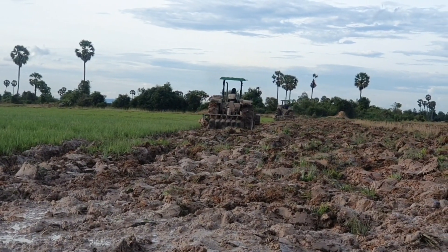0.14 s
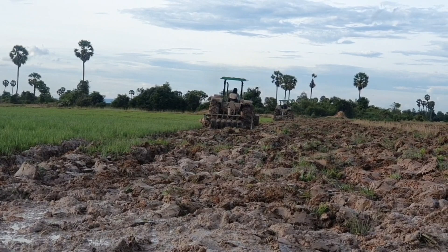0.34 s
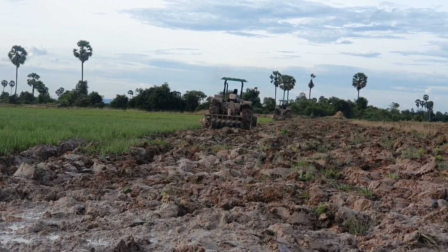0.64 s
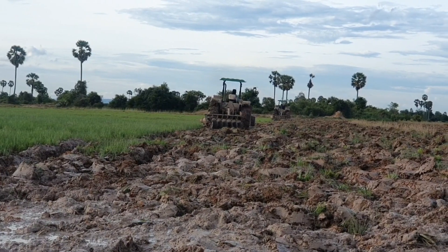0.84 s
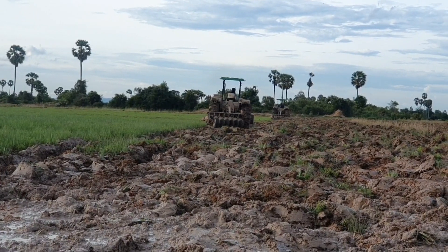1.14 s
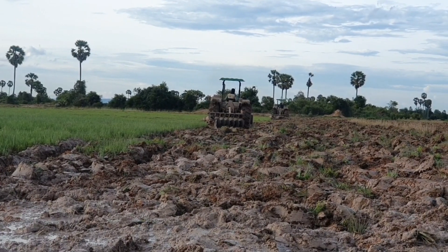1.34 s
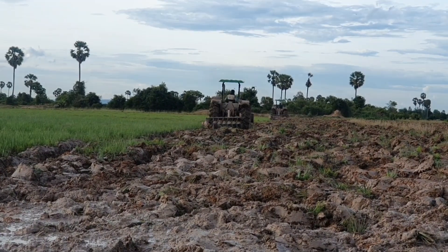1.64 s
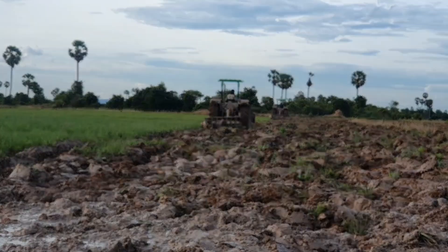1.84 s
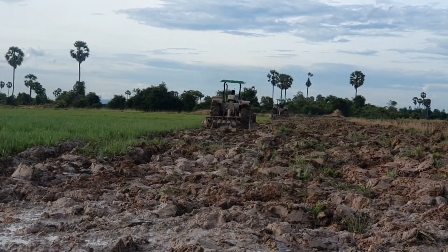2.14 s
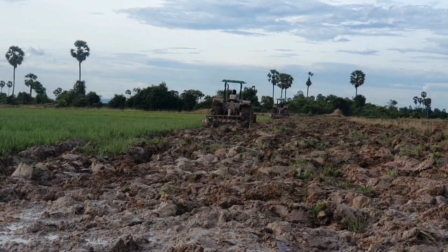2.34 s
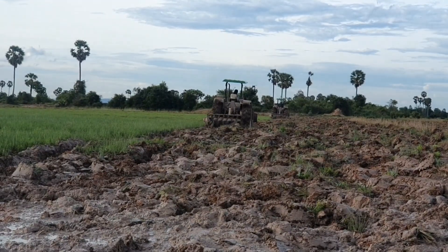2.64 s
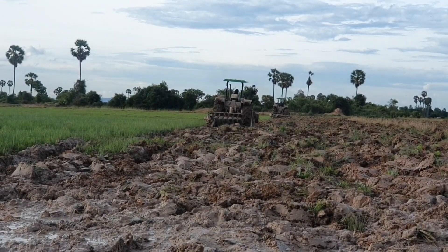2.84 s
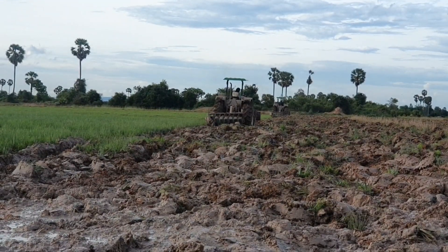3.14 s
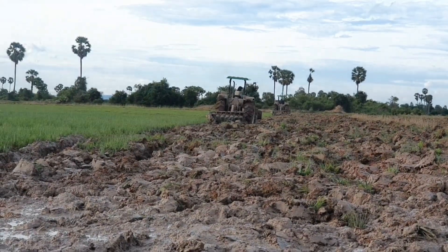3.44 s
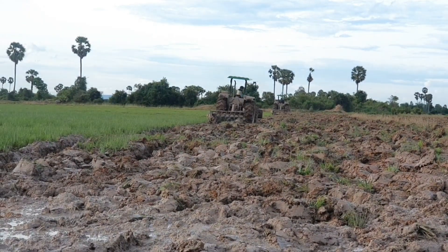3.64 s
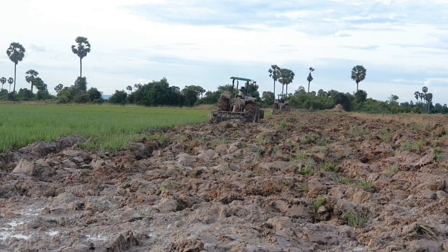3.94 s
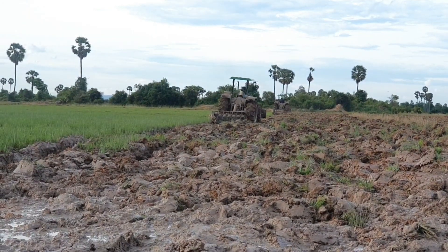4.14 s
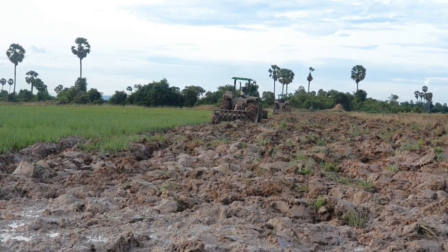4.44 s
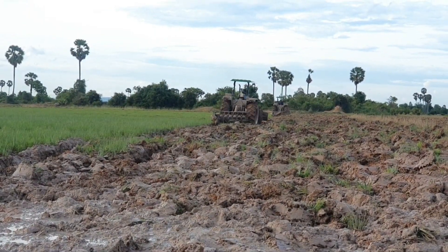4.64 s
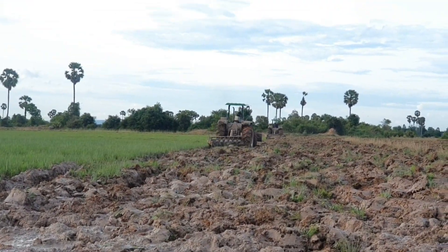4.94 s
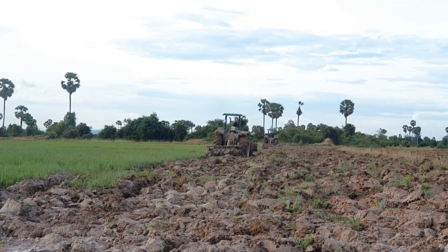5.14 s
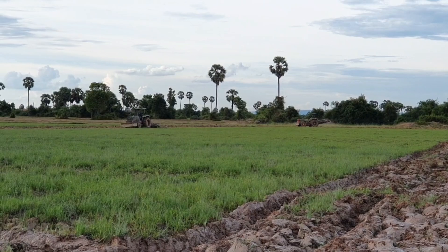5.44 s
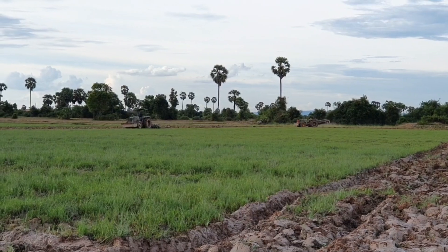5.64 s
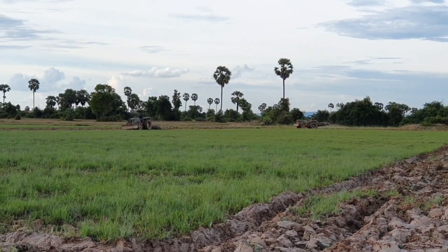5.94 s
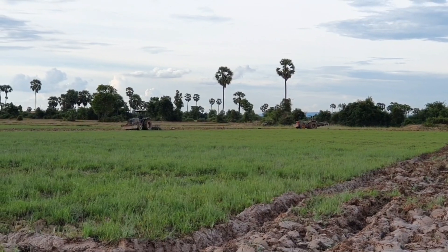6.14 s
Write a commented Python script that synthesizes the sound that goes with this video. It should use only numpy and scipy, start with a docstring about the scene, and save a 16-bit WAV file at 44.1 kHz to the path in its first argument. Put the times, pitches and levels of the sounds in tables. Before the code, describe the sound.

A diesel tractor drones and rattles some way off as wind buffets the microphone, then a click cuts to a fainter engine whirr.

```python
"""A diesel tractor pulls a plough across an open field, some way off: low exhaust orders drone under a
bark of hiss and rattle at every firing, while a slower engine chugs beside it and wind flutters on both
microphone ports. From about 1 s hard knocks ring the panels. From about 3 s the wind puffs, flaps and
pops, and the bark sinks, then returns. At 5.7 s the sound cuts with a click to a farther spot, where the
engine is a faint whirr and a gust arrives."""
import sys
import numpy as np
from scipy import signal
from scipy.fft import rfft, irfft, next_fast_len
from scipy.io import wavfile
from scipy.ndimage import map_coordinates

SR = 44100
rng = np.random.default_rng(int(sys.argv[2]) if len(sys.argv) > 2 else 0)


def master_out(mix):
    """Clip the mix to full scale and print it as 16-bit PCM to the path in sys.argv[1]."""
    frames = np.transpose(np.atleast_2d(mix))
    ceiling = np.clip(frames, -1, 1)
    pcm = np.round(ceiling * 32767).astype(np.int16)
    wavfile.write(sys.argv[1], SR, pcm)


N = 277389


def amp(db):
    return 10 ** (np.asarray(db) / 20)


def unit_rms(x):
    return x / np.sqrt(np.mean(x ** 2) + 1e-20)


def along(points, hz):
    """Read (Hz, value) points on a log frequency axis."""
    freqs, values = np.transpose(points)
    return np.interp(np.log(hz + 1), np.log(freqs + 1), values)


def curves(rows):
    """Automation: one value per sample for each column after the time."""
    times, *columns = np.transpose(rows)
    return [np.interp(np.arange(N) / SR, times, column) for column in columns]


def wobble(rate):
    """A smooth random curve, rate knots a second."""
    return map_coordinates(rng.standard_normal(int(N * rate / SR) + 4), [np.arange(N) * rate / SR])


def bump(centre_s, half_s):
    """A bell of height 1 around a moment."""
    return np.exp(-((np.arange(N) / SR - centre_s) / half_s) ** 2)


def filtered(x, response):
    """EQ x with a gain that is a function of frequency."""
    size = next_fast_len(N + 8192)
    return irfft(rfft(x, size) * response(np.fft.rfftfreq(size, 1 / SR)), size)[..., :N]


def panned(db):
    """Left and right gains; positive pan is to the left."""
    return amp(np.array([db / 2, -db / 2]))


# Wind bed between the puffs: time_s, level_db
FLUTTER_LEVEL = [(0, -45), (.5, -40.5), (1.2, -43.5), (1.7, -45.5), (2.5, -40), (3.1, -41.5), (3.4, -36),
                 (3.7, -43.5), (3.9, -37.5), (4.15, -41), (4.4, -46), (4.9, -42), (5.4, -42.5), (5.69, -47),
                 (5.75, -48.5), (6.1, -59), (6.29, -33.5)]
# Puffs across the ports: centre_s, level_db, length_s, pan_db
WIND_PUFFS = [(0.195, -42, 0.018, 9), (0.348, -43, .05, -5), (1.13, -38, 0.092, -1),
              (1.495, -46, 0.026, 14), (1.814, -32, 0.044, 6), (2.937, -35.5, 0.089, -1),
              (3.157, -32.5, .05, 0), (3.317, -30.5, 0.052, 4), (3.415, -35, 0.085, 0),
              (3.79, -32.5, 0.048, -3), (3.886, -39.5, 0.14, -2), (4.091, -33.5, .1, -6),
              (4.364, -31.5, 0.019, -10), (4.438, -42.5, 0.015, 4), (5.466, -34.5, 0.02, -13),
              (5.613, -33.5, 0.028, 6), (6.225, -35, 0.07, 3), (6.274, -33.5, 0.032, 17)]
# Soft body of the wind: freq_hz, gain_db
RUSTLE_EQ = [(90, -72), (150, -1), (230, 2), (330, 0.5), (450, -6), (650, -31), (900, -28), (1500, -120)]
# Frayed edge of a hard gust: freq_hz, gain_db
FRAY_EQ = [(200, -74), (330, -26.5), (480, 3), (650, -2), (900, -10), (1300, -39), (2200, -120)]


def wind_flutter():
    """Wind flutters on each port separately and swells in puffs; the harder, the brighter it frays."""
    lumps = amp(2.9 * np.array([wobble(45), wobble(45)])) * rng.standard_normal((2, N))
    bed = amp(curves(FLUTTER_LEVEL)[0] + 2.1 * np.array([wobble(18), wobble(18)]))
    blow = bed + sum(amp(db) * panned(pan_db)[:, None] * bump(centre_s, length_s / 2)
                     for centre_s, db, length_s, pan_db in WIND_PUFFS)
    rustle = unit_rms(filtered(lumps, lambda hz: amp(along(RUSTLE_EQ, hz))))
    fray = unit_rms(filtered(lumps, lambda hz: amp(along(FRAY_EQ, hz))))
    fray_gain = amp(-16.5) * (blow / amp(-27)) ** 0.33
    return blow * (rustle + fray_gain * fray)


# Sharp wind flaps on the ports: start_s, peak_db, pitch_hz, pan_db
WIND_FLAPS = [(2.975, -26, 200, 15), (3.435, -13.5, 206, 8), (3.831, -18.5, 256, -4),
              (3.895, -24.5, 352, -6), (4.053, -29, 355, -1), (4.484, -23, 201, 0), (4.539, -31, 268, 4),
              (6.277, -16, 395, 7)]


def wind_flaps(rise_s=0.0027, t60_s=0.031):
    """A flap is a few cycles of vortex shedding, out of step between the ports."""
    out, t = np.zeros((2, N + SR)), np.arange(SR // 10) / SR
    swell = (1 - np.exp(-t / rise_s)) ** 2 * amp(-60 * t / t60_s)
    swell /= swell.max()
    for start_s, db, hz, pan_db in WIND_FLAPS:
        wave = np.sin(2 * np.pi * (hz * t + rng.uniform(0, 0.06, (2, 1))))
        out[:, round(start_s * SR):][:, :len(t)] += amp(db) * panned(pan_db)[:, None] * swell * wave
    return out[:, :N]


# Single pops of air on the ports, the last one (5.79 s) sharpening a beat of the slow engine: time_s, peak_db,
# pitch_hz, pan_db
AIR_POPS = [(3.782, -29, 409, 12), (4.073, -29, 433, 9), (4.366, -22, 301, 3), (5.464, -18, 363, 5),
            (5.603, -15, 516, -10.5), (5.79, -37, 500, 13)]


def air_pops():
    """A pop is one quick push and pull of pressure."""
    out, t = np.zeros((2, N + SR)), np.arange(-200, 200) / SR
    for time_s, db, hz, pan_db in AIR_POPS:
        push = -amp(db) * np.cos(2 * np.pi * hz * t) * np.exp(-(3.0 * hz * t) ** 2)
        out[:, round(time_s * SR) - 130:][:, :len(t)] += panned(pan_db)[:, None] * push
    return out[:, :N]


# Low rumble of the wind: freq_hz, gain_db
BUFFET_EQ = [(13, -47), (22, -18), (54, -2), (92, 0), (260, -17), (340, -32), (570, -120)]


def wind_buffet():
    """Lumpy low buffeting, only partly shared by the ports."""
    own = amp(4.0 * np.array([wobble(34), wobble(17)])) * rng.standard_normal((2, N))
    shared = amp(-7.0 + 3.7 * wobble(18)) * rng.standard_normal(N)
    return unit_rms(filtered(own + shared, lambda hz: amp(along(BUFFET_EQ, hz))))


# Tempo map of the slow engine: beat_number, time_s
CHUG_BEATS = [(0, .073), (15, 1.27), (26, 2.142), (34, 2.778), (46, 3.72), (52, 4.192), (60, 4.827),
              (70, 5.618), (71, 5.712), (74, 5.953), (77, 6.196), (78, 6.277)]
# Fader ride on its puffs: time_s, level_db
CHUG_LEVEL = [(0, -28), (1.5, -24), (2.3, -31.5), (3.5, -32.5), (4.3, -32.5), (4.7, -25.5), (5, -30),
              (5.3, -26), (5.68, -27), (5.71, -36), (5.87, -38), (5.95, -29), (6.03, -34.5), (6.2, -32)]


def slow_engine(pitch_hz=254.6, half_s=0.0035, right_lag_s=0.00036, pan_db=1):
    """Every beat of the slow engine arrives as one short, dull puff of its exhaust."""
    out, t = np.zeros((2, N + SR)), np.arange(-600, 600) / SR - [[0], [right_lag_s]]
    puff = -panned(pan_db)[:, None] * np.cos(2 * np.pi * pitch_hz * t) * np.exp(-(t / half_s) ** 2)
    beats, times = np.transpose(CHUG_BEATS)
    for time_s in np.interp(np.arange(beats[-1] + 1), beats, times):
        db = np.interp(time_s, *np.transpose(CHUG_LEVEL)) + rng.normal(0, 2.5)
        out[:, round(time_s * SR) - 600:][:, :1200] += amp(db) * puff
    return out[:, :N]


# Stereo width of the tractor, 1 is mono: freq_hz, likeness
STEREO_LIKENESS = [(550, 1), (900, 1), (1250, 0.6), (1650, 0.51), (1950, 0.15), (2300, 0.5), (4200, 1),
                   (5700, 0.85), (7000, .87), (8300, 0.75), (9200, 0.23), (10500, 0.32), (12500, 0.35),
                   (15500, .15)]


def spread(pair, eq, band):
    """EQ one band of two unrelated noises and mix them to the left-right likeness of a far source."""
    def mid_side_gains(hz):
        angle = np.arccos(np.clip(along(STEREO_LIKENESS, hz), 0, 1)) / 2
        return band(hz) * amp(along(eq, hz)) * [np.cos(angle), np.sin(angle)]
    mid, side = filtered(pair, mid_side_gains)
    return np.array([mid + side, mid - side])


# Tone tilt between the ports: freq_hz, pan_db
PORT_PAN = [(500, 1), (1100, 0.8), (1500, 0), (2500, -0.5), (3600, -2.5), (4600, -0.5), (6000, 0.5),
            (8200, 4), (11000, 2), (14500, 6)]
# Phase between the ports: freq_hz, left_lead_rad
PORT_PHASE = [(1000, 0.57), (1600, 0.26), (1900, 1), (2050, -1.34), (2700, 0.082), (4000, 0.44),
              (4700, 0.69), (6000, 0.11), (8000, -0.63), (9300, -1.2), (12000, -1)]
# The right port hears later as the tractor moves left: time_s, delay_samples
RIGHT_DELAY = [(0, .7), (1.5, .5), (2.4, 0), (3.3, 0), (4.5, 1.1), (5.7, 1.3)]


def microphone_ports(pair):
    """The housing gives each port its colour and phase; the tractor's bearing delays the right one."""
    def housing(hz):
        return panned(along(PORT_PAN, hz)) * np.exp(1j * np.outer([1, 0], along(PORT_PHASE, hz)))
    left, right = filtered(pair, housing)
    return np.array([left, map_coordinates(right, [np.arange(N) - curves(RIGHT_DELAY)[0]], order=5)])


def firing_bursts(firings, scatter_db, fall_s, steady_db, rise_s=0.0024):
    """Noise opened by each firing: quick rise, slow fall, never quite shut; each has its own size."""
    starts = np.flatnonzero(np.diff(np.floor(firings + 0.24)))
    train, t = np.zeros(N), np.arange(SR // 20) / SR
    train[starts] = amp(scatter_db * rng.standard_normal(len(starts)))
    gate = signal.fftconvolve(train, (1 - np.exp(-t / rise_s)) ** 2 * np.exp(-t / fall_s))[:N]
    return (unit_rms(gate) + amp(steady_db)) * rng.standard_normal((2, N))


# Fader ride on the tractor from the farther spot: time_s, level_db
FAR_LEVEL = [(5.705, -56), (5.85, -58.5), (6.05, -54), (6.2, -53.5), (6.29, -50)]
# Its colour there: freq_hz, gain_db
WHIRR_EQ = [(350, -40), (600, -4), (964, -11), (1360, -8.5), (1530, -6), (1770, -8), (2400, -7), (2620, -9),
            (2880, -14.5), (3680, -13), (4420, -18.5), (6360, -23.5), (7640, -31), (9280, -27),
            (11000, -41), (14300, -75), (22000, -120)]


def far_engine(firings):
    """Far off, the firings nearly merge into a whirr that throbs about twelve times a second."""
    def panel_peaks(hz):
        return sum(amp(db) * width ** 2 / ((2 * (hz - pitch)) ** 2 + width ** 2)
                   for pitch, width, db in PANEL_MODES[1:4])
    throb = amp(0.22 * np.cos(2 * np.pi * firings / 4))
    bursts = firing_bursts(firings, scatter_db=3.0, fall_s=0.0088, steady_db=3.2)
    whirr = unit_rms(spread(bursts, WHIRR_EQ, np.ones_like))
    hum = unit_rms(filtered(rng.standard_normal(N), panel_peaks))
    return amp(curves(FAR_LEVEL)[0]) * throb * (whirr + amp(-3.5) * hum)


# Ring of the bonnet and block: pitch_hz, width_hz, gain_db
PANEL_MODES = [(1060, 180, -4), (1595, 130, -3.5), (2394, 100, -1), (3470, 320, -7.5), (4030, 160, -5),
               (6900, 78, -11)]


def panel_rattle(firings, scatter_db=4.5, mean_delay_s=0.0015):
    """Every firing strikes each panel with a new strength and a slightly new delay."""
    starts, out = np.flatnonzero(np.diff(np.floor(firings + 0.0787))), np.zeros(N)
    for pitch, width, db in PANEL_MODES:
        blows = np.zeros(N + SR)
        delays = (rng.exponential(mean_delay_s, len(starts)) * SR).astype(int)
        blows[starts + delays] = amp(db + scatter_db * rng.standard_normal(len(starts)))
        out += filtered(blows[:N], lambda hz: 1j * hz * width / (pitch ** 2 - hz ** 2 + 1j * hz * width))
    return unit_rms(out)


# The engine's hardest knocks: start_s, strength_db, panel_index
ENGINE_KNOCKS = [(1.072, -33, 0), (1.479, -27.5, 1), (1.917, -31, 2), (1.977, -33, 0), (2.016, -28, 0),
                 (2.316, -32, 1), (2.626, -27, 0), (2.647, -28, 3), (2.688, -28, 1), (2.752, -36, 3),
                 (2.923, -38, 0), (3.03, -41, 2), (3.072, -31, 3), (3.094, -32, 1), (3.114, -29, 1),
                 (3.138, -28, 3), (3.986, -34, 0), (5.649, -35, 3)]
# Midrange focus of a knock: freq_hz, gain_db
KNOCK_EQ = [(350, -52), (700, -3), (4000, -6.5), (6500, -22), (10000, -66)]


def engine_knocks(crack_t60_s=0.0082, ring_t60_s=0.02):
    """A short crack, and one panel ringing on after it."""
    out, t = np.zeros(N), np.arange(SR // 40) / SR
    for start_s, db, panel in ENGINE_KNOCKS:
        crack = amp(12.0 - 60 * t / crack_t60_s) * rng.standard_normal(len(t))
        ring = amp(-60 * t / ring_t60_s) * np.sin(2 * np.pi * PANEL_MODES[panel][0] * t)
        out[round(start_s * SR):][:len(t)] += amp(db) * (crack + ring)
    return filtered(out, lambda hz: amp(along(KNOCK_EQ, hz)))


# Harmonics of the drone: firing_rate_multiple, gain_db
EXHAUST_ORDERS = [(1, -11.5), (2, -1.5), (3, -4.5), (4, -20.5), (5, -27)]


def exhaust_drone(firings, pipe_phase_rad=1.2):
    """The low exhaust orders: clean lines, a little behind the bark, wavering apart at the two ports."""
    phase = 2 * np.pi * (firings - 0.064)
    wave = sum(amp(db + 1.44 * wobble(11)) * np.cos(order * phase - pipe_phase_rad)
               for order, db in EXHAUST_ORDERS)
    return unit_rms(wave) * panned(-0.9 + 1.46 * wobble(5.3))


# Fader ride on the low end: time_s, level_db
BASS_LEVEL = [(0, -27.5), (.1, -22), (.9, -21.5), (1.3, -21.5), (1.75, -22), (2.0, -23.5), (2.6, -22),
              (2.9, -20), (3.2, -26.5), (3.6, -26), (4.2, -27), (4.6, -26.5), (4.85, -29), (5.17, -23.5),
              (5.69, -26.5), (5.705, -37), (6.17, -36), (6.29, -29)]
# Its brief swells (+) and dips (-): centre_s, gain_db
BASS_JOLTS = [(.4, -7), (.62, -5), (.68, 1.5), (.76, -7), (0.871, -10), (1.01, -8), (1.061, 6),
              (1.141, -20), (1.52, -12), (2.67, 4.5), (2.719, 3), (2.761, -10), (2.86, 3), (3.02, -18),
              (3.34, -7), (3.39, 7.5), (3.43, -7), (3.55, -13), (3.701, -53), (3.851, 17.5), (3.883, -9),
              (3.99, -8), (4.119, 10.5), (4.155, -19), (4.335, -9), (4.37, 5), (5.51, 6.5), (6.0, 4)]
# Balance of wind and engine in it: time_s, buffet_over_drone_db
GUST_BALANCE = [(0, 0.5), (.95, -3), (1.12, 3.5), (1.3, -6), (1.85, 0.5), (2.1, -3), (2.7, 0.5), (3, 0.5),
                (4.2, 5.5), (4.5, 4.5), (4.8, -6), (5.69, -1), (5.705, 10), (6.29, 12)]


def drone_and_buffet(firings, waver_db=1.5, jolt_half_s=0.013):
    """Drone and buffeting share the bass in an equal-power blend and waver in level together."""
    gusts = amp(curves(GUST_BALANCE)[0])
    jolts_db = sum(db * bump(centre_s, jolt_half_s) for centre_s, db in BASS_JOLTS)
    level = amp(curves(BASS_LEVEL)[0] + waver_db * wobble(16) + jolts_db)
    return level * (exhaust_drone(firings) + gusts * wind_buffet()) / np.sqrt(1 + gusts ** 2)


# What the moving air lets through: time_s, bark_db, top_over_bark_db
BARK_LEVEL = [(0.0, -45, -18), (0.3, -47.5, -15.5), (0.62, -46, -21.5), (.9, -44, -26), (1.14, -43.5, -31),
              (1.66, -42, -20), (2.44, -40, -18), (2.71, -40, -20), (3.12, -38, -17.5), (3.63, -46, -26),
              (4.02, -49.5, -24), (4.36, -52.5, -21.5), (4.62, -48.5, -20), (4.98, -49, -13),
              (5.25, -45.5, -16.5), (5.48, -43, -21.5), (5.69, -44.5, -17)]
# Exhaust and engine block, notched by the ground echo: freq_hz, gain_db
BODY_EQ = [(320, -18), (550, -4), (636, -3.5), (729, -4), (860, -1.5), (1050, -1), (1230, -7.5),
           (1550, -1.5), (1780, -2.5), (1940, -9.5), (2310, -1), (2780, -5.5), (3450, -0.5), (4570, -6.5),
           (5600, -13), (7280, -28), (12300, -120)]
# Hiss of the exhaust jet: freq_hz, gain_db
JET_EQ = [(3060, -14), (5200, -11.5), (5520, -12.5), (6050, -13), (6760, -7.5), (7800, -11), (8480, -10),
          (9380, -13), (10200, -12), (11500, -13.5), (15700, -30)]


def exhaust_bark(firings):
    """Each firing barks, hisses and rattles; its lows, mids and highs differ in strength each time."""
    bark_db, top_db = curves(BARK_LEVEL)
    hiss_db = -13.5 + 0.25 * (top_db - top_db.mean())
    blur_db = 1.0 - 0.89 * (bark_db - bark_db.mean())  # the firings blur together as the bark fades
    low = spread(firing_bursts(firings, 0.73, 0.0031, blur_db), BODY_EQ, lambda hz: hz < 1250)
    mid = spread(firing_bursts(firings, 3.1, 0.004, blur_db), BODY_EQ,
                 lambda hz: (hz >= 1250) & (hz < 2900))
    high = spread(firing_bursts(firings, 1.64, 0.0081, blur_db - 8), BODY_EQ, lambda hz: hz >= 2900)
    jet = firing_bursts(firings, scatter_db=1.4, fall_s=0.0064, steady_db=-5.5)
    hiss = amp(hiss_db) * unit_rms(spread(jet, JET_EQ, lambda hz: hz < 10000))
    top = amp(top_db) * unit_rms(spread(jet, JET_EQ, lambda hz: hz >= 10000))
    rattle = amp(-10.5) * panel_rattle(firings)
    return amp(bark_db) * (unit_rms(low + mid + high) + rattle + hiss + top)


# The tractor's revs: time_s, firing_rate_hz
FIRING_RATE = [(0.0, 49.39), (0.35, 48.81), (0.7, 49.99), (1.05, 49.53), (1.4, 48.57), (1.75, 50.69),
               (2.1, 50.38), (2.45, 48.6), (2.8, 46.72), (3.15, 46.82), (3.5, 48.22), (3.85, 49.07),
               (4.2, 49.9), (4.55, 49.18), (4.9, 51.03), (5.25, 53.43), (5.69, 52.83), (5.7, 50.4),
               (6.29, 50.4)]
CUT_S = 5.694


def scene():
    """The tractor, nearer and then farther after the cut, with the wind and the slow engine."""
    firings = np.cumsum(curves(FIRING_RATE)[0]) / SR  # running count
    near = exhaust_bark(firings) + engine_knocks()
    tractor = microphone_ports(np.where(np.arange(N) < CUT_S * SR, near, far_engine(firings)))
    return drone_and_buffet(firings) + tractor + wind_flutter() + wind_flaps() + air_pops() + slow_engine()


def record(dry, floor_db=-81, top_hz=15810):
    """The cut breaks the wave with a click; the microphone hisses; nothing passes above top_hz."""
    t = np.arange(N) / SR - CUT_S
    click = -amp(-18.0) * (t > 0) * np.exp(-np.abs(t) / 0.0052)
    hiss = amp(floor_db) * rng.standard_normal(dry.shape)
    return filtered(dry + click + hiss, lambda hz: hz < top_hz)


dry = scene()
out = record(dry)
master_out(out)
```